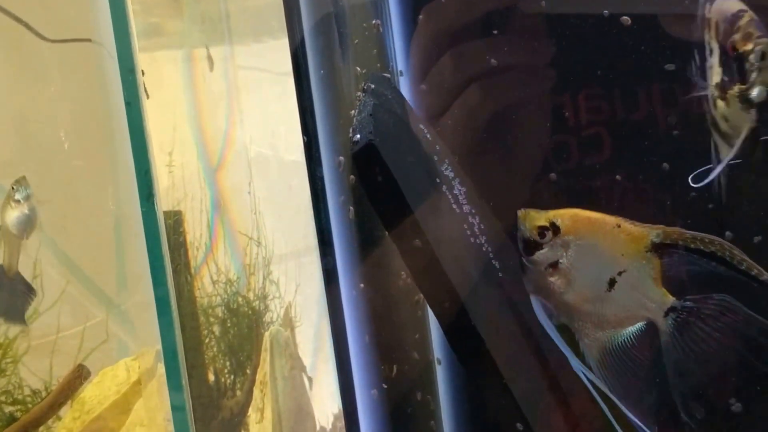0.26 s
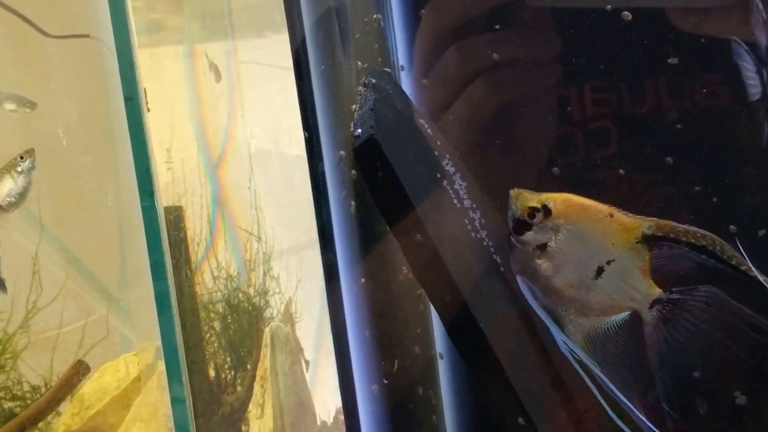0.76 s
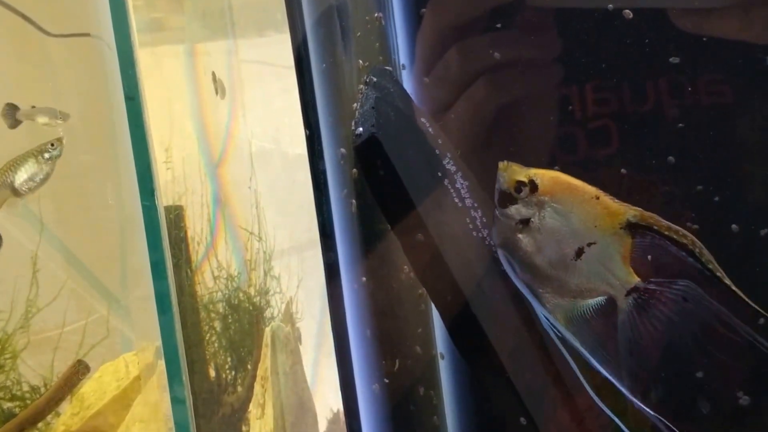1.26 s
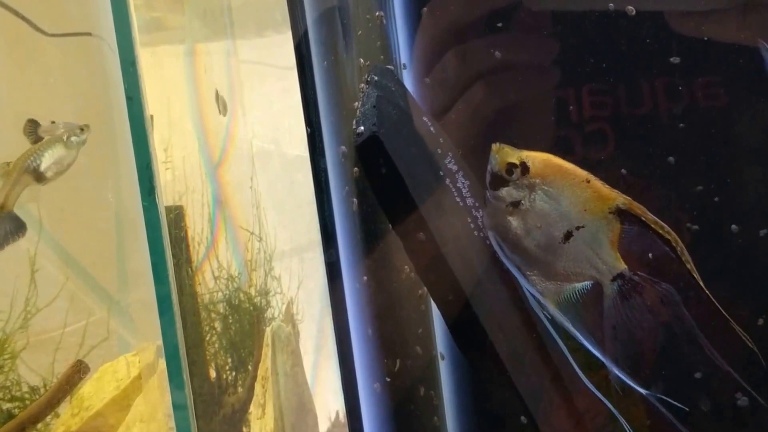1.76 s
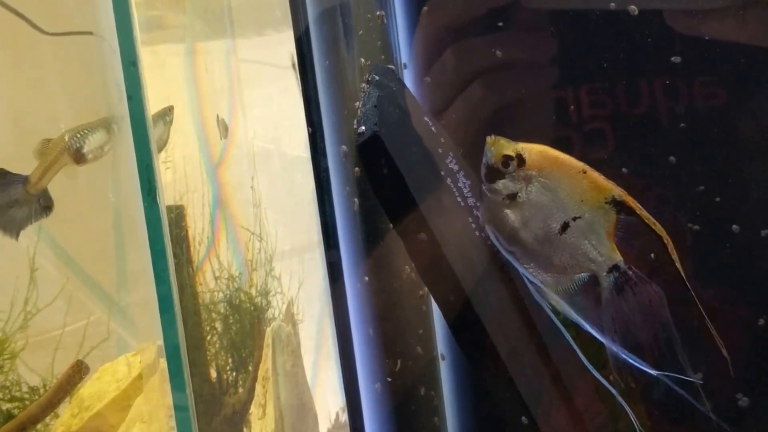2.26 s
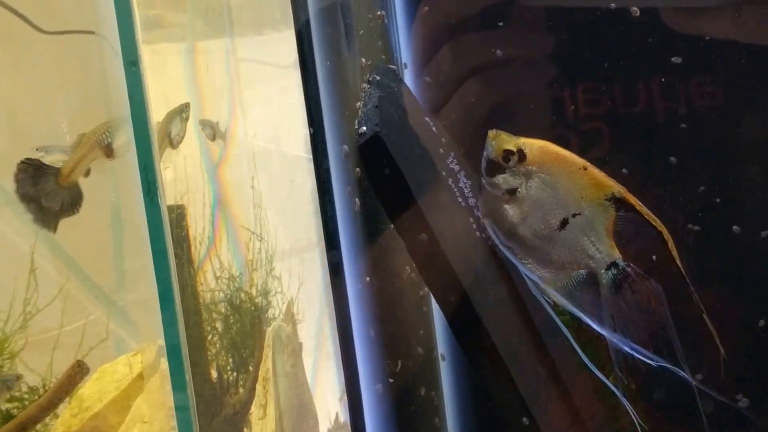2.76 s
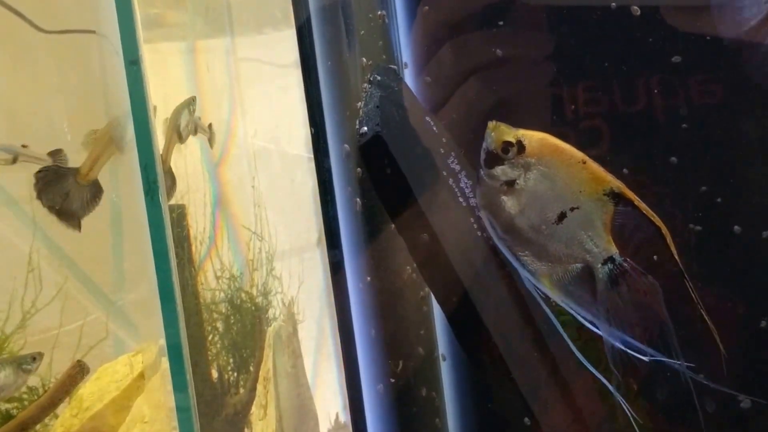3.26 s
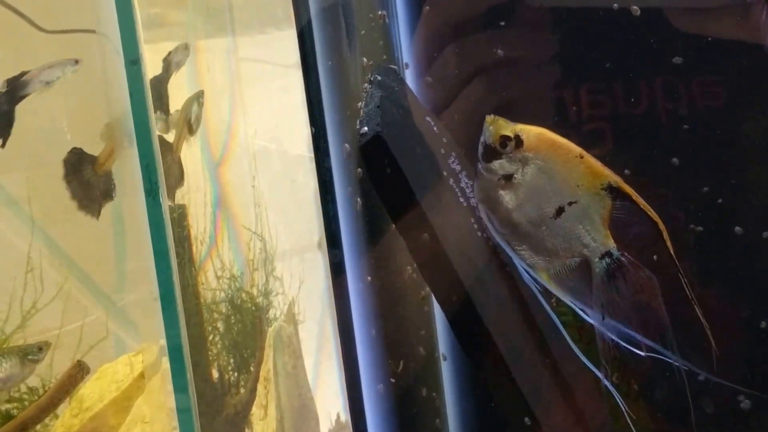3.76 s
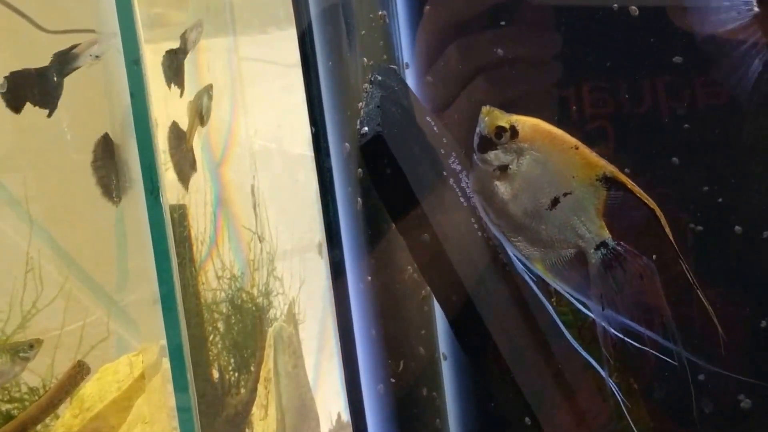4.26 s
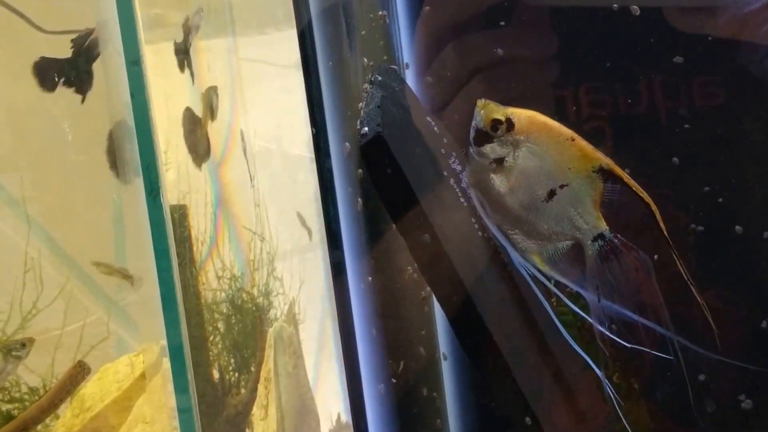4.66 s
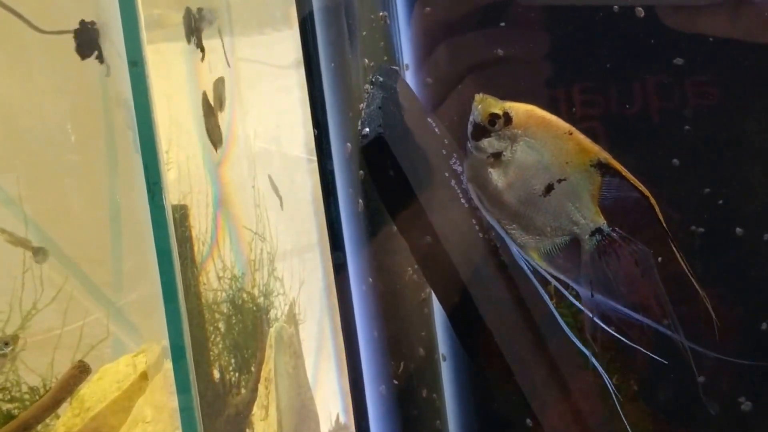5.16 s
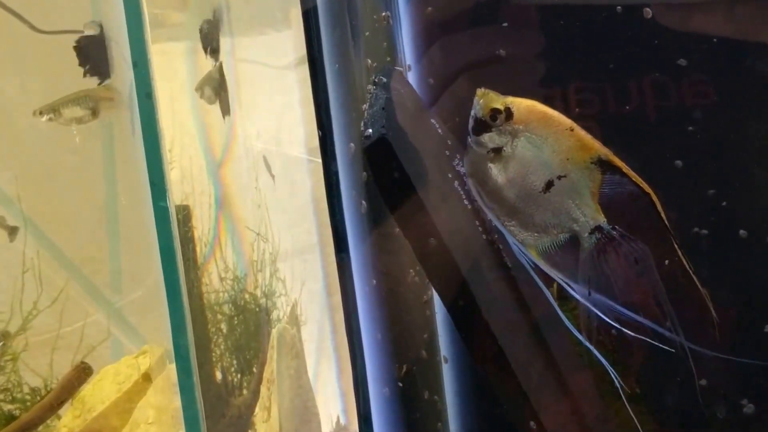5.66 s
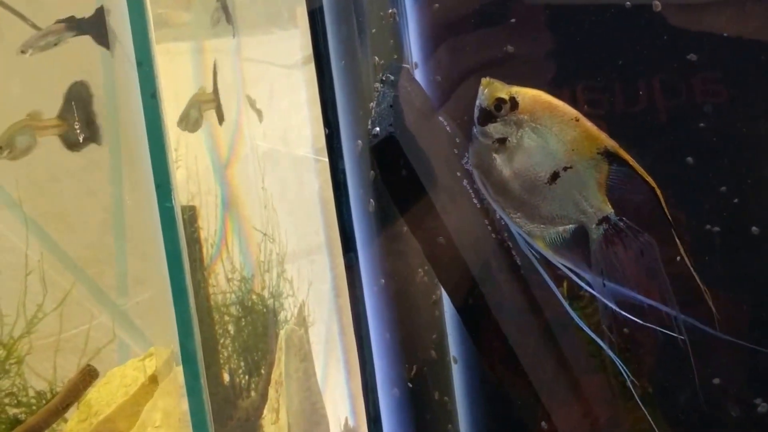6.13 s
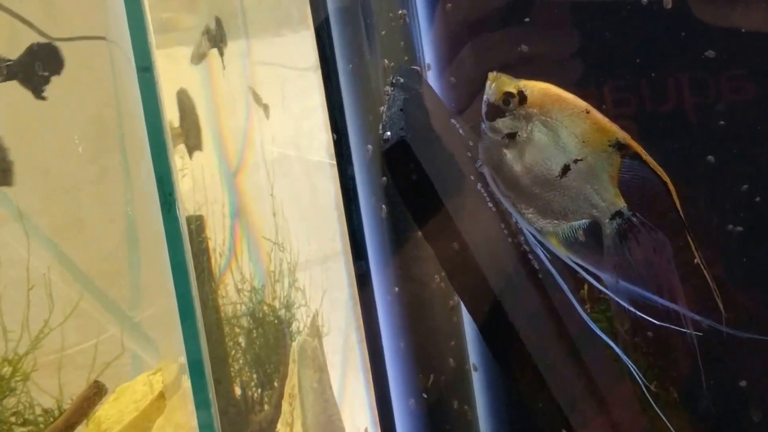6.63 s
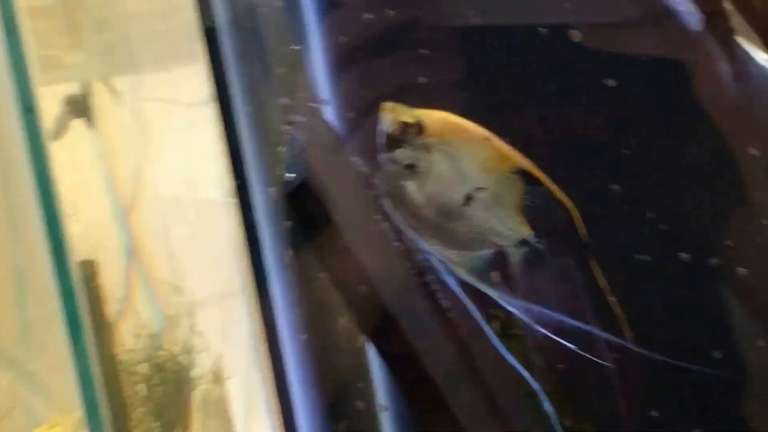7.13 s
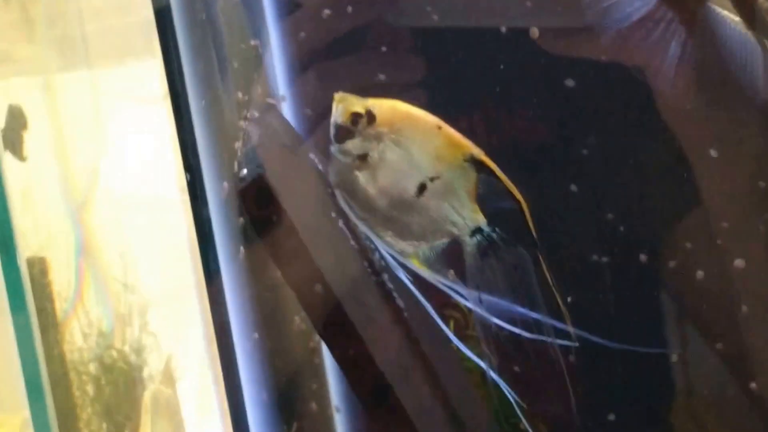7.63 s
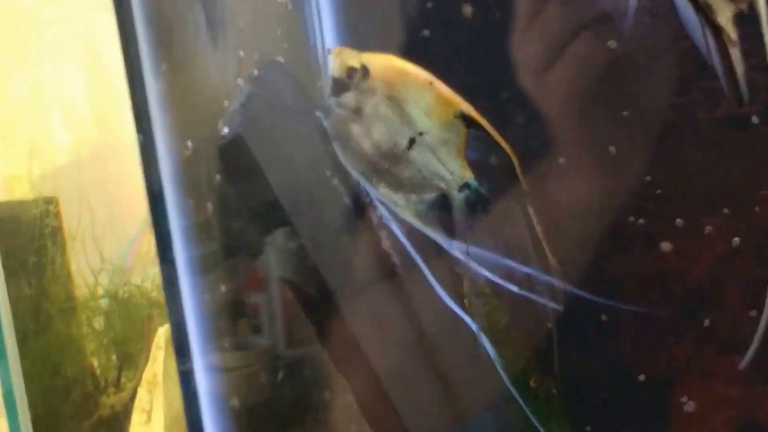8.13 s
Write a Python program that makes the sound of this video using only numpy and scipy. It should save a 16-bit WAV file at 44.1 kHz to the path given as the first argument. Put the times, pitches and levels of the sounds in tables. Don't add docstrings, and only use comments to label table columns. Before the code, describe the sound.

From 0 seconds, aquarium air pumps are already running in a small room, and they never stop. A deep, even mains hum carries a dense, raspy buzz that reaches high into a thin, sizzling edge. Slower motors waver quietly beneath it, and a soft hiss of water and air fills the background. Around 0.2, 0.5 and 1.7 seconds, very faint brushes or drips touch the hand-held microphone. Between about 2.5 and 3.4 seconds the buzz changes colour slightly as the hand drifts, with more tiny touches near 3.5, 3.7, 4.1 and 5.1. After 6 seconds the hand begins to turn; from about 7 seconds soft low grip rumble rises, the buzz shifts more quickly, and a little extra hiss reflects off the nearer glass. The hum continues to the end, around 8.4 seconds. The sound is close and mono.

```python
import sys
import numpy as np
from scipy import signal
from scipy.fft import rfft, irfft, next_fast_len
from scipy.io import wavfile

SR = 44100
rng = np.random.default_rng(int(sys.argv[2]) if len(sys.argv) > 2 else 0)


def decibels_to_gain(level_db):
    exponent = np.asarray(level_db, float) / 20
    return 10 ** exponent


def log_audio(samples):
    frames = np.atleast_2d(samples).T
    limited = np.clip(frames, -1, 1)
    pcm = np.round(limited * 32767).astype(np.int16)
    wavfile.write(sys.argv[1], SR, pcm)


N = 369999


def in_time(rows):
    s, *columns = np.transpose(rows)
    return [np.interp(np.arange(N) / SR, s, column) for column in columns]


def at_hz(points, hz):
    point_hz, db = np.transpose(points)
    return np.interp(np.log(hz + 1), np.log(point_hz), db)


def blend(still, busy, share):
    return still + (busy - still) * share


def rms_one(x):
    return x / np.sqrt(np.mean(x ** 2) + 1e-20)


def drift(rate):
    r = np.exp(-200 * np.pi * rate / SR)
    slow = signal.lfilter([1], [1, -2 * r, r * r], rng.standard_normal(N // 100 + 2002))[2000:]
    return np.interp(np.arange(N) / 100, np.arange(len(slow)), rms_one(slow - slow.mean()))


def band(low_hz, high_hz, count, order=8):
    hz = np.arange(count // 2 + 1) * SR / count
    off = abs(2 * hz - low_hz - high_hz) / (high_hz - low_hz)
    gain = np.exp(-np.minimum(off, 10) ** order / 2)
    return rms_one(irfft(rfft(rng.standard_normal(count)) * gain, count))


def bursts(rows, attack, order, power=2):
    out = np.zeros(N)
    for s, length, low_hz, high_hz, db in rows:
        count = int(length * SR)
        start = max(int(s * SR) - count // 2, 0)
        angle = np.interp(np.arange(count) / count, [0, attack, 1], [0, np.pi / 2, np.pi])
        noise = rms_one(band(low_hz, high_hz, count=2 ** 15, order=order)[:count])
        out[start:start + count] += decibels_to_gain(db) * np.sqrt(2) * np.sin(angle) ** power * noise
    return out


def looped(order, gain, turns, phase):
    size = 2 ** 14
    tones = np.zeros(size // 2 + 1, complex)
    tones[order] = gain * np.exp(2j * np.pi * turns)
    stroke = irfft(tones) * size / np.sqrt(2)
    return np.interp(phase * size, np.arange(size + 1), np.append(stroke, stroke[0]))


MAINS_HZ = 60.028
# (multiple of the mains [1], level [dB rms])
PUMP_TONES = [(1, -59), (2, -54.5), (3, -65), (4, -72.5), (5, -65), (6, -80), (7, -76), (8, -61.5),
              (9, -69.5), (10, -82), (11, -89), (12, -91), (13, -78.5), (14, -73), (15, -83), (16, -82),
              (17, -81), (18, -79), (19, -83.5), (20, -90.5), (21, -80.5), (22, -82.5), (23, -69.5),
              (24, -79.5), (25, -93), (26, -87), (27, -82.5), (28, -83), (29, -81.5), (30, -84),
              (31, -84), (32, -85), (33, -79), (34, -83), (36, -87), (37, -81), (38, -93), (40, -85),
               (42, -84), (44, -76), (45, -85), (46, -88), (47, -84), (50, -86), (51, -92), (52, -85),
               (53, -84), (60, -81), (61, -84), (62, -83), (70, -78), (75, -84), (76, -83), (77, -85),
               (83, -79), (86, -78), (92, -79), (93, -79), (98, -79), (99, -78),
              (106, -75), (107, -78), (108, -74), (109, -77), (110, -72), (111, -73), (112, -78),
                 (115, -71), (116, -76), (117, -73), (118, -78), (119, -77), (120, -71), (121, -71),
                 (122, -71), (124, -72), (125, -78), (126, -73), (129, -74), (132, -75), (136, -72),
                 (137, -78), (141, -78), (156, -85), (158, -88), (160, -86), (165, -86), (169, -89),
                 (177, -88), (186, -91)]
# (frequency [Hz], level per tone [dB rms])
CHATTER_TREND = [(1800, -91), (3000, -88), (4200, -90), (5500, -82), (6800, -83.5), (8200, -81.5),
                 (9000, -92.5), (10500, -96), (12000, -101), (14500, -107)]
# (multiple of the mains [1], pose 0 [dB], pose 2 [dB], pose 3 [dB])
POSE_CHANGES = [(8, 0, -1, 2), (9, -1, 0, -5), (16, 0, 2, -9), (23, -1, -4, -10), (33, 0, -5, -3),
                (36, 7, 14, 7), (38, 5, 10, 17), (44, 0, -12, 0), (51, 2, 14, 12), (70, 0, -3, -12),
                (83, 0, 1, -12), (115, -3, -2, -2), (116, 7, 3, 0), (136, -6, -7, -10), (60, 1, -2, -4),
                (86, 0, -2, -3), (126, 0, 0, -2), (129, 2, 0, -3), (132, 0, -3, -5), (177, 5, -4, -7)]
# (pose 0 [dB], pose 1 [dB], pose 2 [dB], pose 3 [dB])
GLASS_LIFT_DB = (0, 0, 5, 5)


def pumps(pose, sway):
    order = np.arange(1, 251)
    hz = order * MAINS_HZ
    scatter_db = np.clip(1.9 * rng.standard_normal(len(order)), -12, 4)
    level_db = at_hz(CHATTER_TREND, hz) + scatter_db
    for multiple, db in PUMP_TONES:
        level_db[int(multiple) - 1] = db

    change_db = 5 * rng.standard_normal((4, len(order))) * np.minimum(hz / 6000, 1)
    change_db = np.minimum(change_db, 2)
    change_db += np.outer(GLASS_LIFT_DB, (hz > 2050) & (hz < 3100))
    change_db[1] = 0
    for multiple, *db in POSE_CHANGES:
        change_db[[0, 2, 3], int(multiple) - 1] = db

    phase = (MAINS_HZ * np.arange(N) / SR + 0.00088 * drift(0.67)) % 1
    turns = rng.random((4, len(order)))
    turns[0, :3] = 0
    held = np.zeros(N)
    for k in range(4):
        share = np.maximum(1 - abs(pose - k), 0)
        held += share * looped(order, decibels_to_gain(level_db + change_db[k]), turns[0], phase)

    reach = np.minimum(hz / 1500, 1)
    stray = sum(drift(0.49) * looped(order, decibels_to_gain(level_db) * reach, start, phase) for start in turns[1:])
    return held + sway * stray / np.sqrt(3)


# (frequency [Hz], level [dB rms])
SLIPPING_MOTORS = [(39.8, -75), (47.4, -83.5), (86.9, -84.5), (159.3, -71), (200.4, -78), (230.2, -72),
                   (262.2, -75.5), (637.0, -84.5), (806.0, -80.5), (936.1, -81), (995.5, -86),
                   (1552.7, -85)]


def motors():
    t = np.arange(N) / SR
    out = np.zeros(N)
    for hz, db in SLIPPING_MOTORS:
        level = np.sqrt(2) * decibels_to_gain(db + drift(1.3))
        out += level * np.sin(2 * np.pi * (hz * t + rng.random()) + 0.39 * drift(0.8))
    return out


# (time [s], low edge
# [Hz], high edge [Hz], level [dB rms])
TOUCHES = [(.23, 8500, 10500, -67), (.54, 1200, 2200, -68), (1.65, 4900, 5600, -68),
           (3.478, 4700, 5000, -70), (3.735, 1900, 2300, -68), (4.132, 11500, 15600, -75),
           (5.128, 6850, 7250, -62), (6.3, 46, 60, -65), (7.25, 11000, 14500, -78), (7.4, 200, 225, -69),
           (7.8, 42, 60, -65), (7.63, 150, 190, -62), (7.7, 9900, 11400, -70)]


def touches():
    rows = [(s, 0.07 + 16 / low, low, high, db) for s, low, high, db in TOUCHES]
    return bursts(rows, attack=0.3, order=2)


def grip_rumble(moving):
    noise = band(52, 98, count=N) + 0.34 * band(98, 900, count=N)
    return decibels_to_gain(blend(-85, -62.5, moving)) * noise


GLASS_FACING = (.3, 0.98, 1.3, .6)


def glass_reflection(pose, moving):
    near = moving * np.interp(pose, [1, 2, 2.5, 3], GLASS_FACING)
    noise = band(2100, 2400, count=N) + 0.88 * band(2600, 3100, count=N) + 1.2 * band(3100, 6300, count=N)
    return decibels_to_gain(blend(-85, -80, near)) * noise


# (frequency [Hz], density [dB per Hz])
NOISE_FLOOR = [(25, -99.1), (36, -88), (70, -93.5), (140, -92.5), (300, -91.5), (550, -91.5), (1000, -98),
               (2000, -102.7), (4000, -105.0), (5300, -100.9), (6900, -93.5), (8300, -102.0),
               (10500, -109.4), (15500, -114.7)]
# (frequency [Hz], width [Hz], lift [dB])
RESONANCES = [(4600, 220, -3.5), (26, 14, -5), (47, 13, 6.5), (83, 10, 7.5), (255, 15, -4.5), (317, 14, 6),
              (420, 30, 2.5), (590, 20, -10), (720, 23, -6.5), (824, 27, 5.5), (103, 9.6, -4.5),
              (523, 19, 3), (15100, 730, 3)]


def water_and_air():
    size = next_fast_len(N)
    hz = np.arange(size // 2 + 1) * SR / size
    db = at_hz(NOISE_FLOOR, hz)
    for centre, width, top_db in RESONANCES:
        db = db + top_db / (1 + (2 * (hz - centre) / width) ** 2)
    noise = irfft(rfft(rng.standard_normal(size)) * decibels_to_gain(db) * np.sqrt(SR / 2), size)[:N]
    return noise * decibels_to_gain(0.94 * drift(5.4))


# (time [s], centre [Hz])
FLICKERS = [(.037, 5000), (.289, 7300), (.313, 8600), (.916, 8600), (1.451, 7700), (1.472, 4700),
            (1.59, 9000), (1.8, 6300), (1.938, 5700), (2.078, 5500), (2.262, 7500), (3.008, 7200),
            (3.191, 5700), (4.332, 4700), (4.4, 10300), (4.401, 5700), (4.471, 6300), (4.7, 9000),
            (4.728, 4700), (4.747, 10300), (5.655, 5700), (6.654, 5700), (6.885, 6300), (6.885, 8200),
            (7.65, 5700)]


def flickers():
    frame, frame_start, faint = 1024, 494, 17
    s, hz = np.transpose(FLICKERS)
    s = np.append(s, rng.choice(s, faint, replace=False))
    hz = np.append(hz, rng.uniform(11700, 15200, faint))
    s = (np.round((s * SR - frame_start) / frame) * frame + frame_start) / SR
    width = 0.24 * np.minimum(hz, 7000)
    db = at_hz(NOISE_FLOOR, hz) + 10 * np.log10(width) - 1.5
    length = np.full(len(s), 0.034)
    return bursts(zip(s, length, hz - width / 2, hz + width / 2, db), attack=0.5, order=30, power=1)


# (time [s], pose [0-3, held at the ends], movement [0-1])
HAND = [(0, -2.5, .05), (2.5, 0, 0), (3.4, 1, 0.1), (6, 0.5, 0), (6.5, 0, 0.5), (7.05, 1, 1), (7.3, 1.9, 1),
        (7.55, 2.5, 0.95), (7.85, 1.6, 1), (8.1, 2.5, 1.0), (8.25, 2.5, 0.6), (8.4, 5, 0.5)]


def scene():
    pose, moving = in_time(HAND)
    pose = np.clip(pose, 0, 3)
    sway = blend(0.15, 0.22, moving)
    machines = pumps(pose, sway) + motors()
    handling = touches() + grip_rumble(moving)
    mono = machines + handling + glass_reflection(pose, moving) + water_and_air()
    return np.stack([mono, mono])


def top_cut(x):
    return signal.sosfilt(signal.butter(12, 15710, fs=SR, output="sos"), x)


def record(dry):
    offset = -0.001
    mix = dry + offset + flickers() * [[1], [-1]]
    return top_cut(mix)


dry = scene()
out = record(dry)
log_audio(out)
```